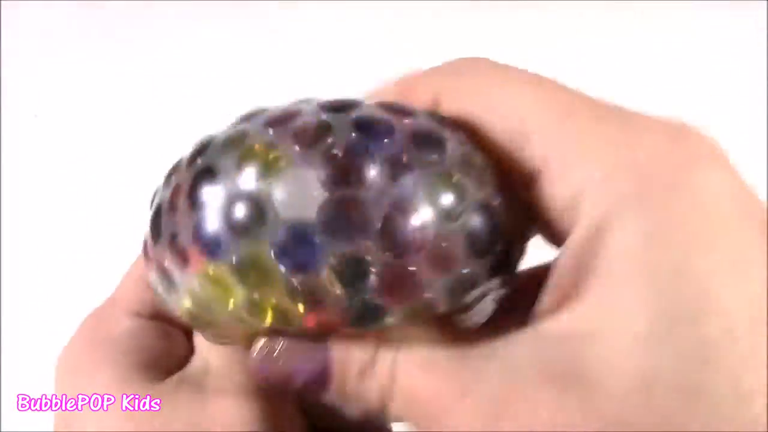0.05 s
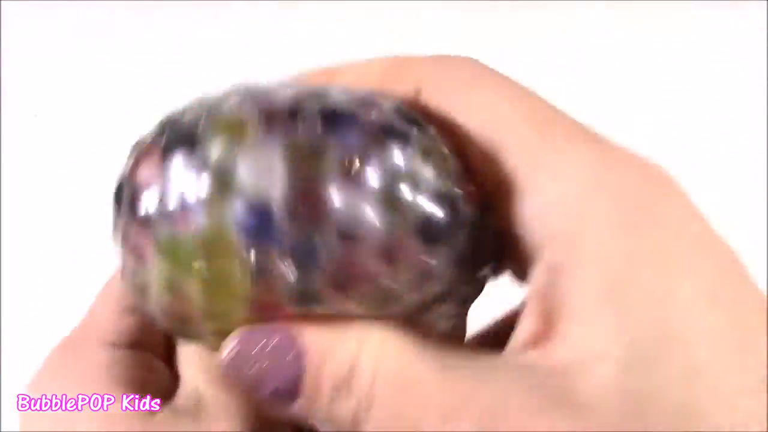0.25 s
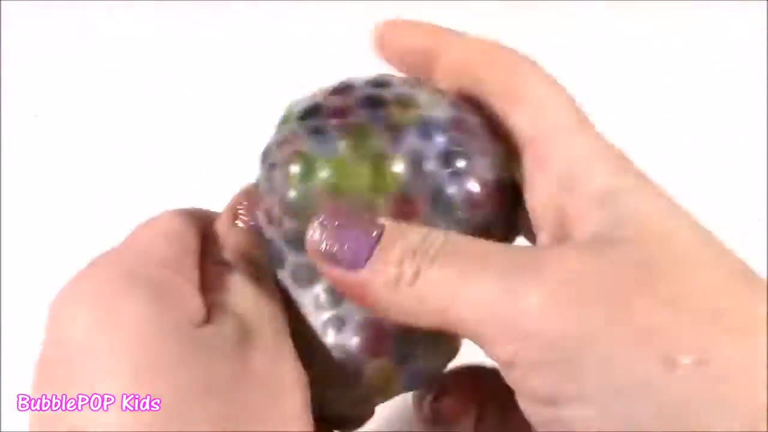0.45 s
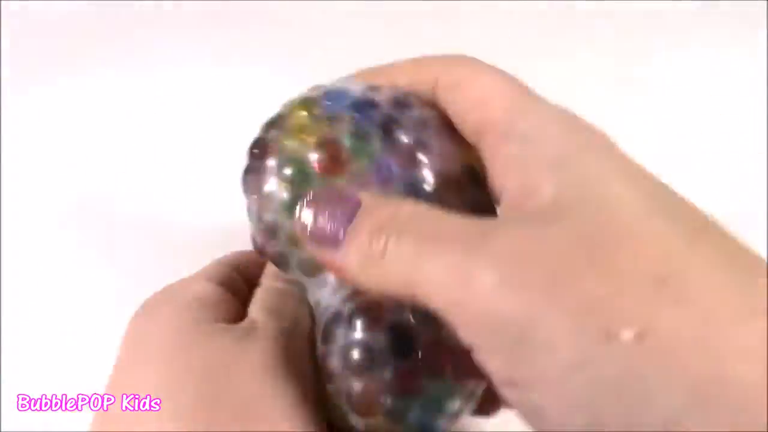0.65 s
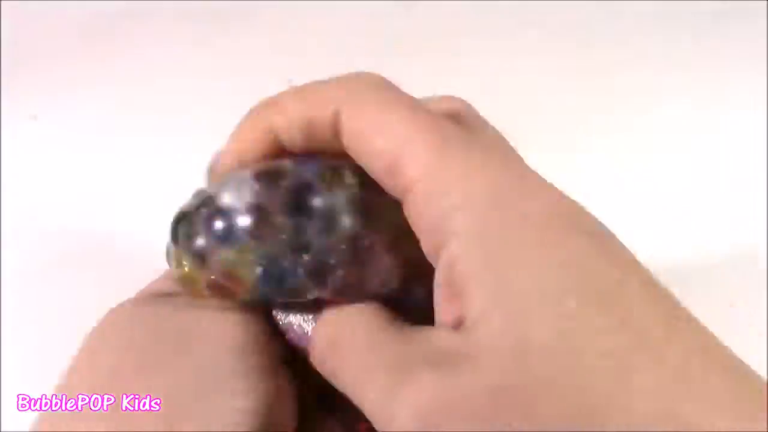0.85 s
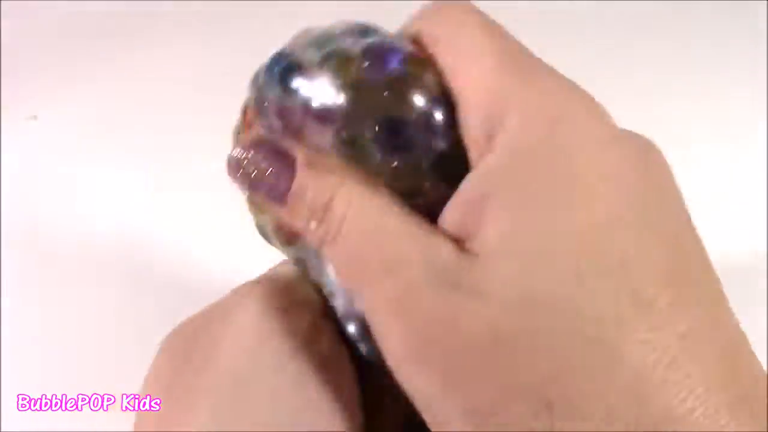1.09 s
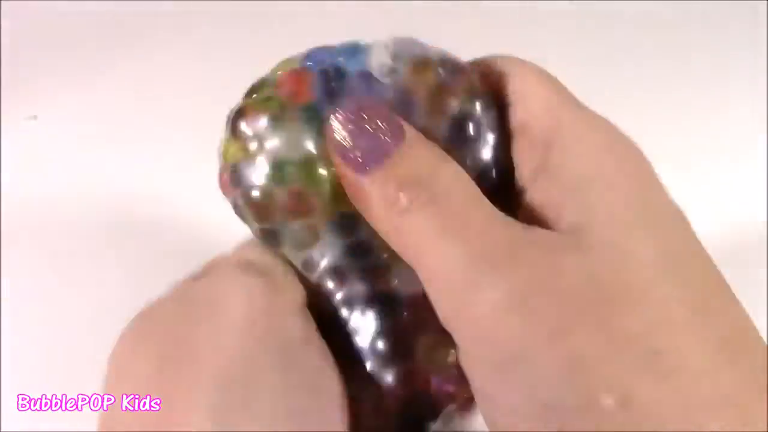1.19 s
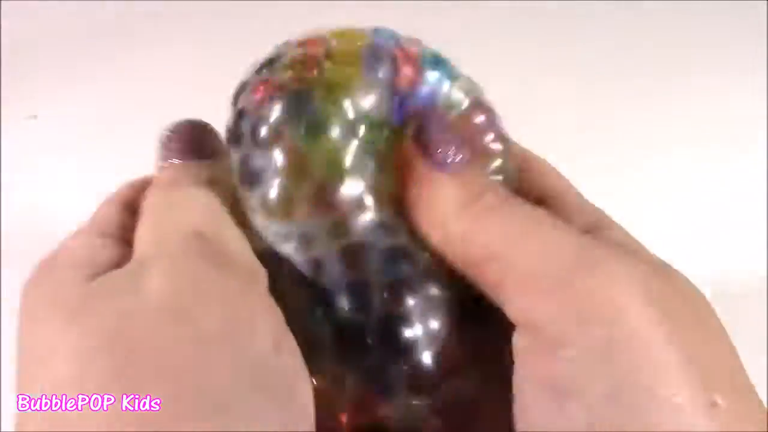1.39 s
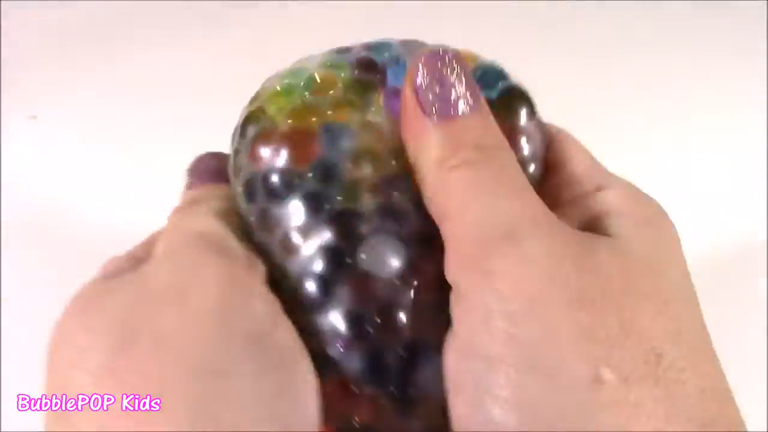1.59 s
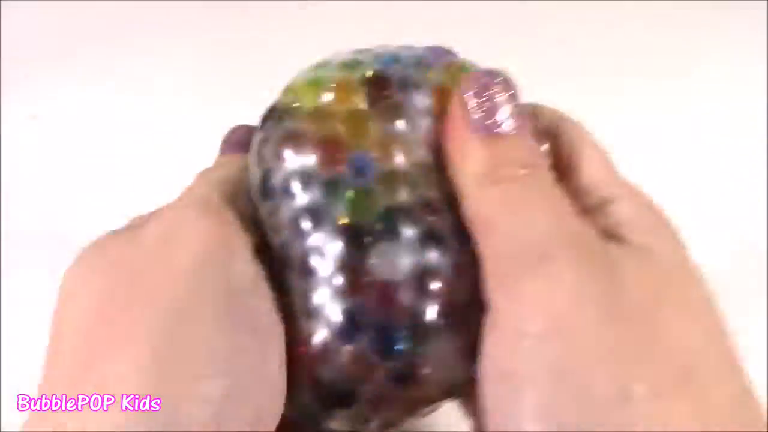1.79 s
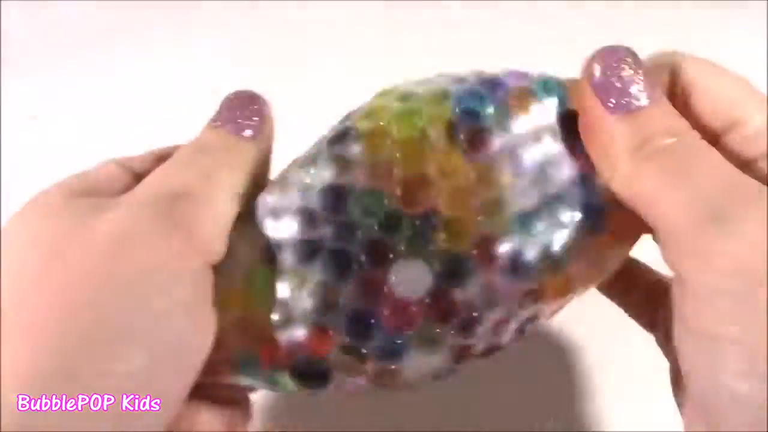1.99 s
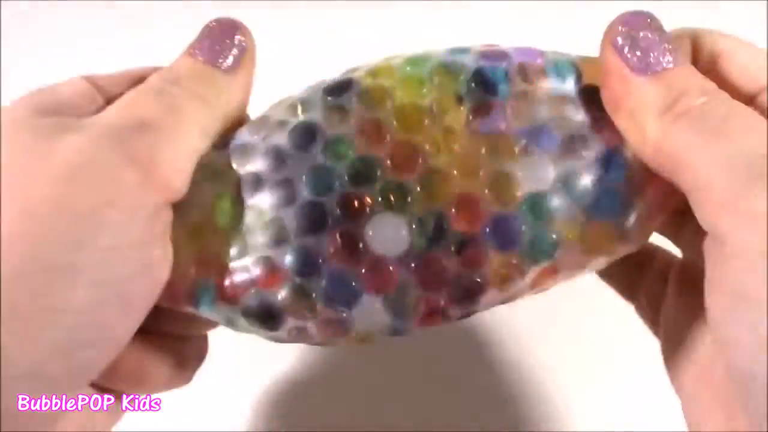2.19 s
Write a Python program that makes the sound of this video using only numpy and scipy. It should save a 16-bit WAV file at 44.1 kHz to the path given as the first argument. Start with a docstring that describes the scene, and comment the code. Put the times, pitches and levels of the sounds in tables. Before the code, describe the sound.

A squishy ball of wet gel beads crunches softly as hands knead it, with sharp pops.

```python
"""Swells of wet crunching and fizzing, dotted with sharp pops and a few squelches, in a small room.
Two hands knead and stretch a rubber ball full of wet gel beads, close to the microphone.
Each push makes a swell of tiny stick-slip grains: beads crunch, the tacky skin fizzes, the ball rubs dully.
Beads slipping past each other and skin snapping off the fingers give the sharp pops.
Table top and room answer faintly, over a steady hush."""
import sys
import numpy as np
from scipy import signal
from scipy.fft import rfft, irfft, next_fast_len
from scipy.io import wavfile
from scipy.ndimage import map_coordinates

SR = 44100
rng = np.random.default_rng(int(sys.argv[2]) if len(sys.argv) > 2 else 0)


def master_out(mix):
    """Clip the mix to full scale and print it as 16-bit PCM to the path in sys.argv[1]."""
    frames = np.transpose(np.atleast_2d(mix))
    ceiling = np.clip(frames, -1, 1)
    pcm = np.round(ceiling * 32767).astype(np.int16)
    wavfile.write(sys.argv[1], SR, pcm)


N = 99225
SWELL_SHAPE = 1.47  # 1 = pointed, 2 = rounded

# Spectrum of bead crunch and squelches. Each row: frequency in Hz, gain in dB.
BEAD_COLOUR = [(300, -33), (700, -7), (1400, -1.5), (2200, -4), (4500, 0), (7500, -4), (12000, -58)]
# Spectrum of pops and ticks. Each row: frequency in Hz, gain in dB.
SNAP_COLOUR = [(30, -14), (400, -7), (1300, 0), (3200, -2), (4500, 3), (5900, 0), (7100, -8), (8800, 1),
               (15000, -1), (18000, -16)]


def kneading():
    """Each push swells and fades, driving stick-slip grains: ball rub, bead crunch, skin fizz, ticks."""
    # Finger pushes. Each row: peak time, rise, fall in seconds, then rub, crunch, fizz levels in dB.
    pushes = [ (.008, .01, 0.018, -51, -46, -52), (0.1, 0.014, 0.015, -48.5, -41, -35.5),
              (.127, 0.011, 0.0067, -48, -45, -42), (0.195, 0.013, 0.017, -45.5, -50, -48.5),
              (0.291, .018, 0.013, -40.5, -39, -35.5), (0.322, 0.01, 0.0063, -46, -39, -37),
              (0.375, 0.014, 0.03, -44, -45, -46.5), (0.445, 0.014, 0.043, -54, -43.5, -39),
              (0.474, 0.012, 0.0057, -40, -33, -32), (.59, 0.053, 0.033, -48.5, -48, -51.5),
              (0.669, 0.023, 0.011, -69, -46, -43), (0.699, 0.011, 0.0047, -44.5, -31, -37.5),
              (0.792, 0.064, 0.019, -50.5, -47, -48.5), (0.883, 0.031, 0.023, -48, -37, -35),
              (0.991, .036, 0.013, -53, -36, -41.5), (1.057, 0.026, 0.044, -46.5, -39, -40),
              (1.14, 0.012, 0.031, -52, -35, -36.5), (1.216, 0.027, 0.077, -76, -43, -42),
              (1.252, 0.0092, 0.016, -48, -34.5, -40), (1.299, 0.011, 0.083, -51.5, -48.5, -51.5),
              (1.459, 0.038, 0.015, -50.5, -41, -36.5), (1.483, 0.031, 0.026, -48, -39.5, -59),
              (1.565, 0.11, 0.041, -51, -47.5, -49), (1.635, .006, 0.0073, -49.5, -39.5, -39),
              (1.651, 0.0046, 0.0056, -57, -32, -36.5), (1.75, 0.18, 0.079, -59.5, -55.5, -54.5),
              (1.874, 0.027, 0.023, -52, -45, -44), (2.007, 0.043, 0.016, -52.5, -49, -38.5),
              (2.047, 0.016, 0.019, -52, -46, -45.5), (2.147, 0.01, 0.13, -55, -54.5, -50),
              (2.245, 0.0035, 0.0091, -39, -51, -41), ]
    # Grain settings, each in the order that grains() lists.
    crunch_grains = (1400, 3200, 0.9, 1.43, 5.9, 0.36)
    fizz_grains = (1500, 9260, 0.4, 2.6, 1.4, 0.25)
    rub_grains = (900, 390.5, 0.78, 1.25, 8.7, 0.38)
    tick_grains = (193, 5204, 0.3, 1.5, 8, 0)
    # Spectra of skin fizz and ball rub. Each row: frequency in Hz, gain in dB.
    fizz_colour = [(3000, -20), (6300, -4), (9000, 2), (12500, 5), (16000, 3)]
    rub_colour = [(40, -36), (110, -17), (200, -0.5), (450, 1.5), (750, -2), (1500, 1.5), (4000, -37)]
    tick_db, tick_db_per_crunch_db = -17.5, 0.87
    power = np.zeros((3, N))
    for peak_s, rise_s, fall_s, *levels_db in pushes:
        power += np.outer(amp(levels_db), swell(peak_s, rise_s, fall_s)) ** 2
    rub_env, crunch_env, fizz_env = np.sqrt(power)
    ticks = amp(tick_db) * crunch_env ** tick_db_per_crunch_db * grains(tick_grains, SNAP_COLOUR)
    crunch = crunch_env * grains(crunch_grains, BEAD_COLOUR)
    fizz = fizz_env * grains(fizz_grains, fizz_colour, size=64)
    rub = rub_env * grains(rub_grains, rub_colour, size=800)
    return ticks + rub + skin_sticking() * (crunch + fizz)


def skin_sticking(rate_hz=350, depth_db=2.6):
    """Tacky skin sticks and lets go in small clusters: a quick random gain, rms 1."""
    knots = rng.standard_normal(int(N * rate_hz / SR) + 4)
    flutter = map_coordinates(knots, [np.arange(N) * rate_hz / SR])
    return unit(amp(depth_db * flutter))


def pops(size=4096):
    """Each pop starts at once, rings briefly at its pitch and leaves a shiver. Returns mid and side."""
    # Pops and soft knocks; the loudest pop has a low thump under it. Big pops span several rows.
    # Each row: start in seconds, level in dB over 1 ms, pitch in Hz, width in octaves.
    rings = [ (.2214, -15, 1600, .52), (.2215, -25, 3950, .14), (.2214, -34, 9500, .3),
             (0.3623, -23.5, 11100, .19), (0.4722, -26.5, 10240, 0.65), (0.6652, -23, 11300, 0.81),
             (0.7, -36, 1040, 0.056), (.7007, -25, 4800, 0.36), (.7488, -32.5, 6440, .31),
             (.8933, -26, 4940, .52), (.989, -26, 6250, 0.42), (.994, -26.5, 4000, 0.38),
             (1.0098, -22.5, 4170, 0.28), (1.1346, -8.3, 9200, .1), (1.1349, -12.5, 11800, .2),
             (1.1347, -14, 4400, .1), (1.135, -18, 5700, .1), (1.1348, -27, 1700, .3),
             (1.1352, -39, 130, 1.2), (1.2493, -25.5, 3400, .6), (1.292, -31, 9550, .4),
             (1.453, -30.5, 1040, 0.09), (1.4677, -27, 8300, 0.2), (1.468, -25, 3660, 0.31),
             (1.481, -26, 2220, 0.45), (1.4903, -30.5, 4030, 0.16), (1.511, -32.5, 3500, 0.19),
             (1.5203, -31, 4240, 0.34), (1.6503, -25.5, 2840, 0.18), (1.6985, -37, 1500, .45),
             (1.7272, -20, 11400, .5), (1.7895, -36.5, 2000, .8), (1.8879, -18, 9300, .25),
             (1.8882, -16.5, 13200, .1), (1.9565, -35, 5800, .4), (1.9646, -33.5, 1700, 1.0),
             (1.968, -11.5, 11200, .1), (1.9683, -18, 8000, .08), (1.9684, -26.5, 4800, .55),
             (1.9672, -32.5, 1080, .22), (2.0112, -29, 9000, 0.38), (2.1452, -30, 11400, 0.63),
             (2.223, -30.5, 10300, 0.69), (2.229, -41.5, 92, 0.54), (2.2424, -29.5, 3240, .25), ]
    click_db, shiver_db, pan_spread = -30, -11, 0.049
    shiver_t60_s = 0.02  # at 1 kHz; higher pops die sooner
    out = np.zeros((2, N + size))
    hz, t = np.fft.rfftfreq(size, 1 / SR), np.arange(size) / SR
    for start_s, level_db, pitch_hz, width_oct in rings:
        band = np.exp(-(np.log2((hz + 1) / pitch_hz) / (2 * width_oct)) ** 2)
        click = amp(click_db) * np.minimum(1, pitch_hz / (hz + 1))
        gain = np.hypot(band, click) * amp(along(SNAP_COLOUR, hz))
        ring = irfft(gain * np.exp(1j * minimum_phase(gain)))
        decay = amp(-60 * t / shiver_t60_s * np.sqrt(pitch_hz / 1000))
        shiver = signal.fftconvolve(ring, rng.standard_normal(size) * decay)[:size]
        pop = unit(ring) + amp(shiver_db) * unit(shiver)
        pop = amp(level_db) * np.sqrt(SR / 1000) * pop / np.linalg.norm(pop)
        start = round(start_s * SR)
        out[:, start:start + size] += np.outer([1, pan_spread * rng.standard_normal()], pop)
    return out[:, :N]


def squelches(rate_hz=2500, scatter_oct=0.182, life_cycles=8.1, scatter_db=2):
    """Beads squeeze past each other through the gel: short swells of tiny bubbles around one pitch."""
    # Each row: peak time in seconds, half length in seconds, level in dB, pitch in Hz.
    squeezes = [(0.671, 0.0022, -26, 5560), (1.469, 0.01, -36, 3900), (1.494, 0.0059, -35, 3900),
                (1.662, 0.017, -45, 2930)]
    out = np.zeros(N)
    for peak_s, half_s, level_db, pitch_hz in squeezes:
        bubble_grains = (rate_hz, pitch_hz, scatter_oct, life_cycles, scatter_db, 0)
        bubbles = grains(bubble_grains, BEAD_COLOUR, size=192)
        out += amp(level_db) * swell(peak_s, half_s, half_s) * bubbles
    return out


def table_echo(x, delay_s=0.0023, echo_db=-19):
    """x plus one reflection off the table top under the ball."""
    return filtered(x, lambda hz: 1 + amp(echo_db) * np.exp(-2j * np.pi * hz * delay_s))


def room(x, level_db=-15):
    """Short diffuse tail; the treble dies first."""
    # Each row: frequency in Hz, time to fall 60 dB in seconds.
    t60_s = [(200, 0.42), (14000, 0.11)]
    hz, t, noise = signal.stft(rng.standard_normal(SR // 3), SR, nperseg=256)
    decay = amp(-60 * t / along(t60_s, hz)[:, None])
    tail = signal.istft(noise * decay, SR, nperseg=256)[1]
    return amp(level_db) * signal.fftconvolve(x, tail / np.linalg.norm(tail))[:N]


def hush(noise_db=-53, hum_db=-72, hum_hz=178.8, hum_width_hz=4):
    """Steady room and microphone noise with a faint wavering hum. Returns mid and side."""
    # Noise spectrum. Each row: frequency in Hz, gain in dB.
    noise_colour = [(15, -59), (25, -22), (263, 5.5), (451, 6), (1020, 1.5), (2610, -5.5), (6920, -10),
                    (16000, -10)]
    # Stereo width. Each row: frequency in Hz, side over mid in dB.
    side_colour = [(60, -14.5), (500, -8.5), (1500, -15), (12000, -24)]
    mid, side = amp(noise_db) * unit(coloured(rng.standard_normal((2, N)), noise_colour))
    hum = filtered(rng.standard_normal(N), lambda hz: 1 / (1 + ((hz - hum_hz) / hum_width_hz) ** 2))
    return mid + amp(hum_db) * unit(hum), coloured(side, side_colour)


def grains(settings, colour, size=256):
    """Steady stream of tiny damped rings, each size samples long, over optional hiss; rms 1."""
    rate_hz, pitch_hz, scatter_oct, life_cycles, scatter_db, hiss_share = settings
    hiss = unit(coloured(rng.standard_normal(N), colour))
    count = int(rate_hz * N / SR)
    starts = rng.integers(0, N, (count, 1))
    pitch_draw, level_draw, sign_draw = rng.standard_normal((count, 3)).T[:, :, None]
    hz = np.minimum(pitch_hz * 2 ** (scatter_oct * pitch_draw), SR / 2)
    cycles = hz * np.arange(size) / SR
    strength = np.sign(sign_draw) * amp(scatter_db * np.clip(level_draw, -2, 2)) * hz / pitch_hz
    rings = strength * np.sin(2 * np.pi * cycles) * np.exp(-cycles / life_cycles)
    stream = np.bincount((starts + np.arange(size)).ravel(), rings.ravel(), N)[:N]
    return np.sqrt(1 - hiss_share) * unit(coloured(stream, colour)) + np.sqrt(hiss_share) * hiss


def swell(peak_s, rise_s, fall_s):
    """Envelope of height 1; rise and fall run between the peak and 1/e."""
    t = np.arange(N) / SR - peak_s
    return np.exp(-np.abs(t / np.where(t < 0, rise_s, fall_s)) ** SWELL_SHAPE)


def minimum_phase(gain):
    """Phase of a struck resonator with this spectrum."""
    cepstrum = irfft(np.log(np.maximum(gain, 1e-6)))
    half = len(cepstrum) // 2
    return rfft(np.concatenate([cepstrum[:1], 2 * cepstrum[1:half], np.zeros(half)])).imag


def amp(db):
    """Decibels to gain."""
    return 10 ** (np.asarray(db) / 20)


def unit(x):
    """x scaled to rms 1."""
    return x / np.sqrt(np.mean(x ** 2) + 1e-20)


def along(points, hz):
    """(Hz, value) points read on a log frequency axis."""
    knots_hz, values = np.transpose(points)
    return np.interp(np.log(hz + 1), np.log(knots_hz + 1), values)


def filtered(x, response):
    """x through the frequency response given by response(hz)."""
    size = next_fast_len(N + SR // 4)
    return irfft(rfft(x, size) * response(np.fft.rfftfreq(size, 1 / SR)), size)[..., :N]


def coloured(x, points):
    """x shaped by (Hz, dB) points."""
    return filtered(x, lambda hz: amp(along(points, hz)))


def scene():
    """Ball in the centre, just over a table; pops and hush have a little width."""
    pop_mid, pop_side = pops()
    ball = table_echo(kneading() + squelches() + pop_mid)
    hush_mid, hush_side = hush()
    mid = ball + room(ball) + hush_mid
    side = pop_side + hush_side
    return np.array([mid + side, mid - side])


def record(dry, ceiling=0.92, cutoff_hz=16100):
    """Hard limit on the peaks, then a steep low-pass."""
    limited = np.clip(dry, -ceiling, ceiling)
    return filtered(limited, lambda hz: 1 / np.sqrt(1 + (hz / cutoff_hz) ** 200))


dry = scene()
out = record(dry)
master_out(out)
```